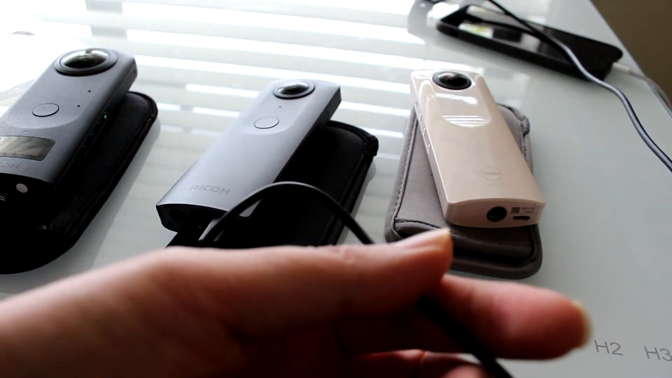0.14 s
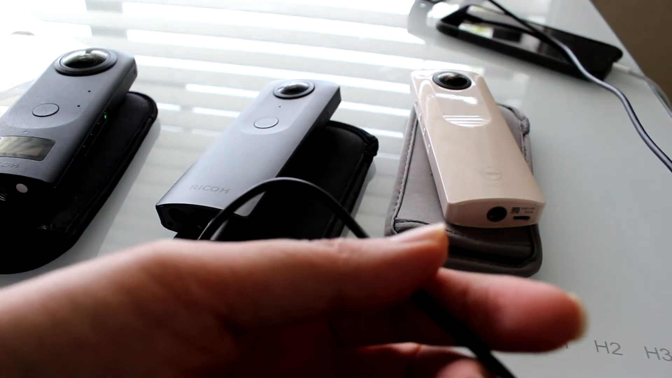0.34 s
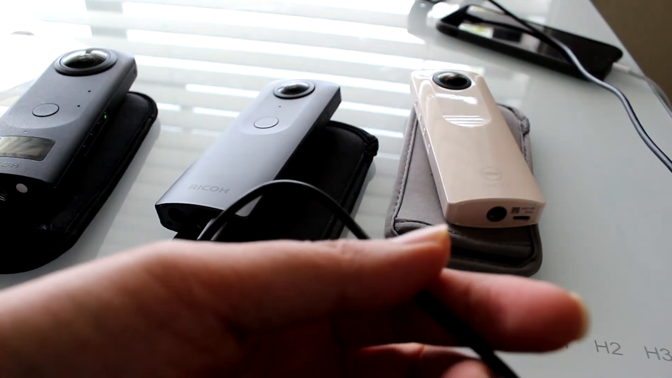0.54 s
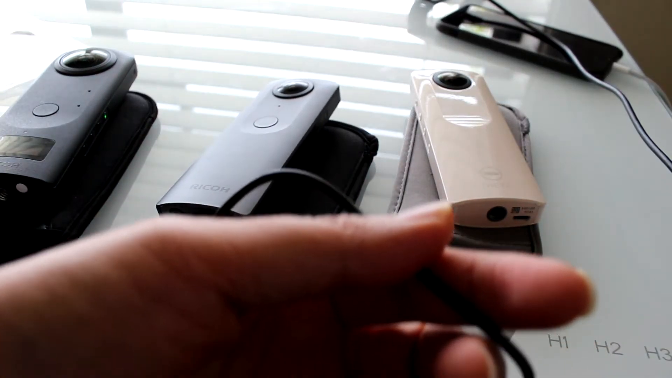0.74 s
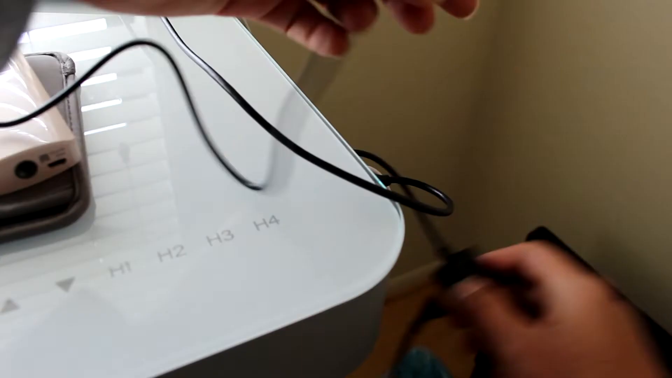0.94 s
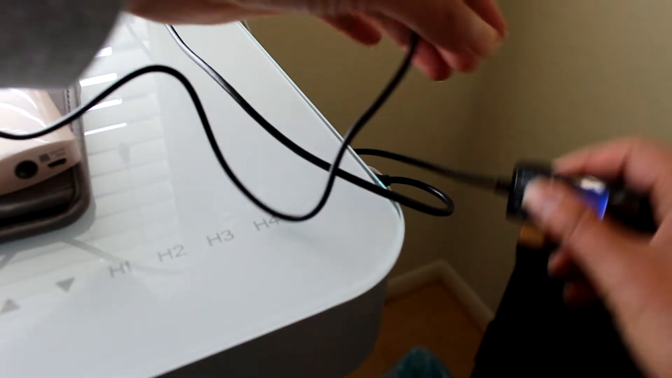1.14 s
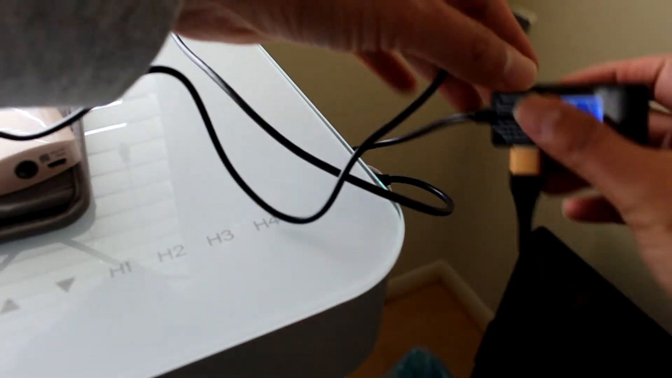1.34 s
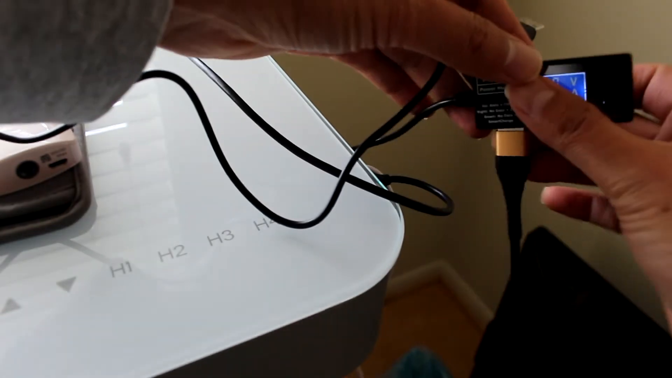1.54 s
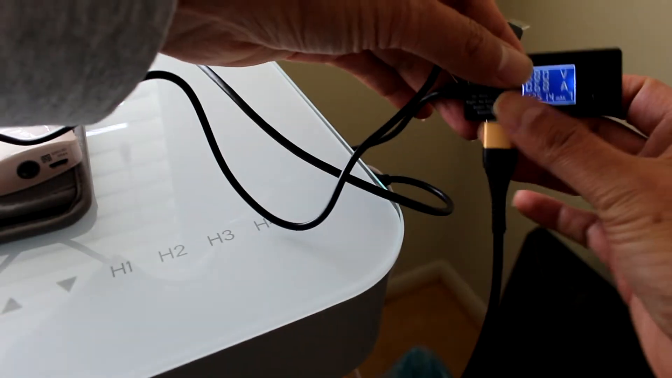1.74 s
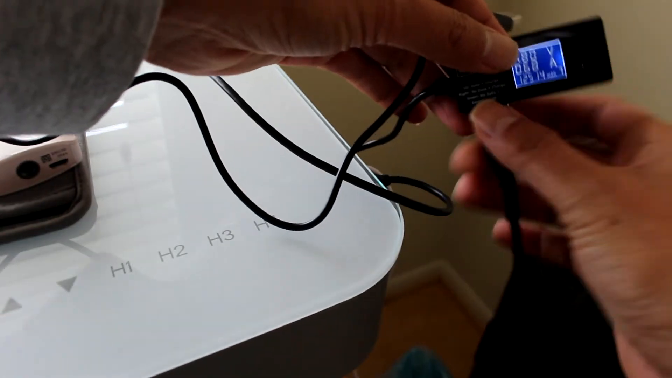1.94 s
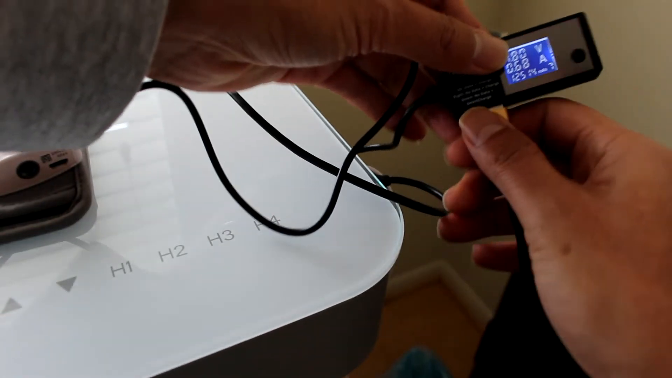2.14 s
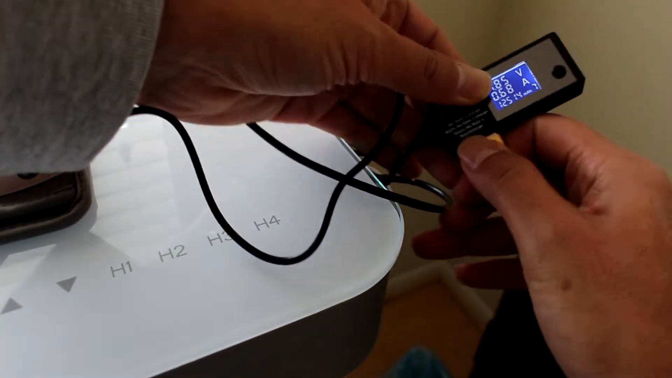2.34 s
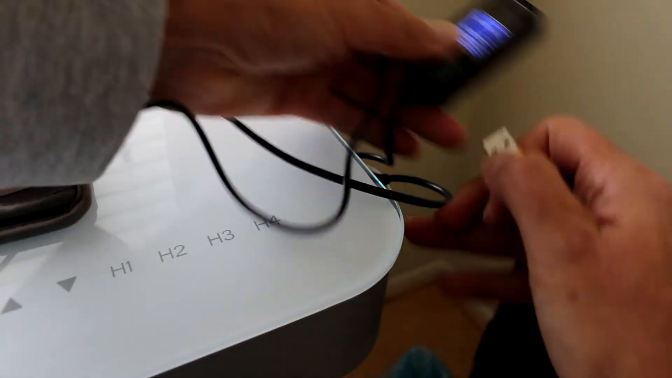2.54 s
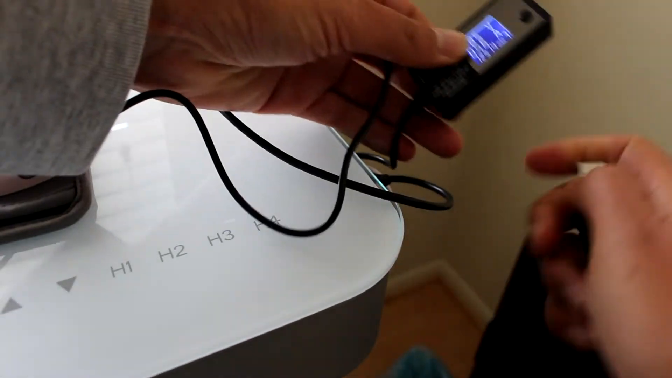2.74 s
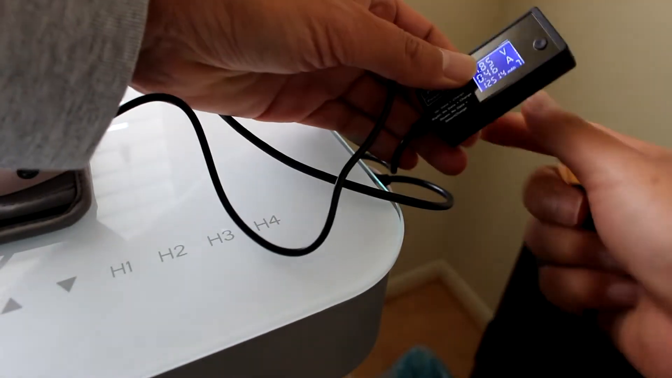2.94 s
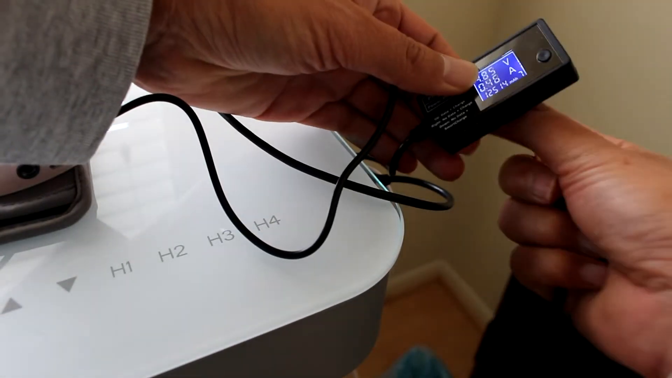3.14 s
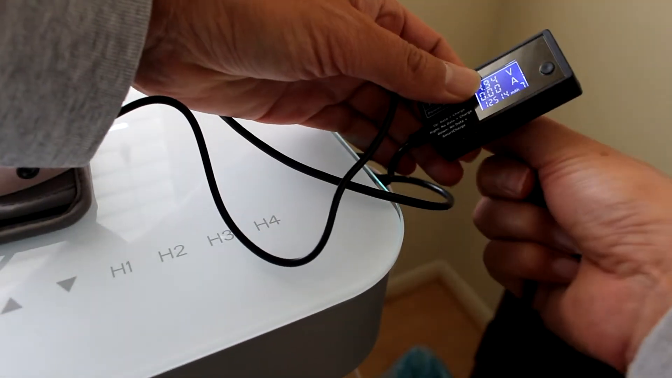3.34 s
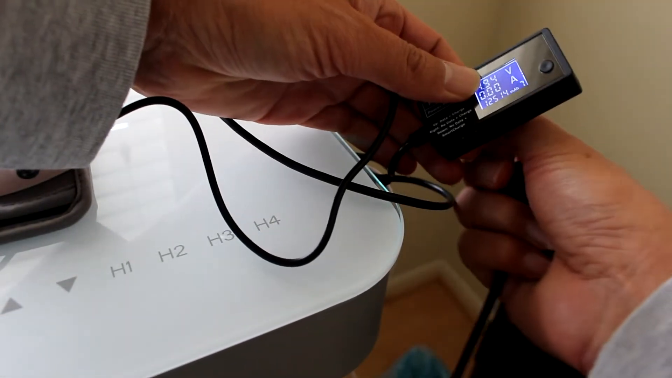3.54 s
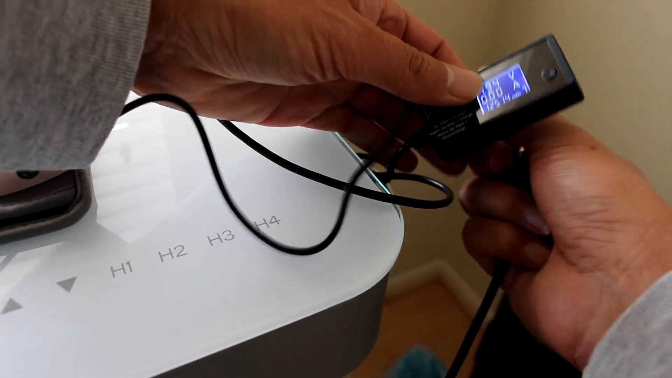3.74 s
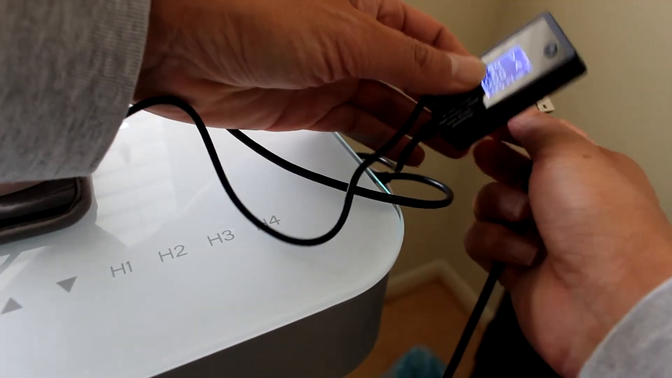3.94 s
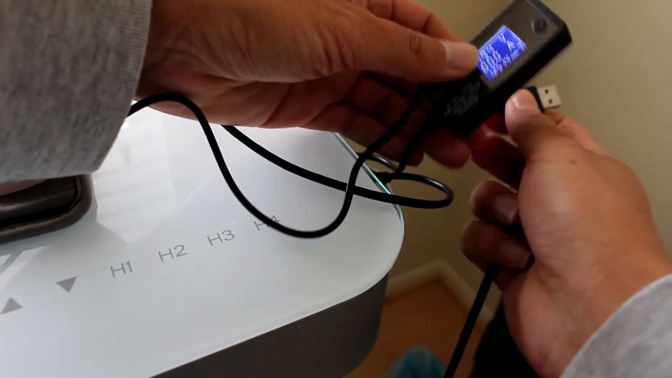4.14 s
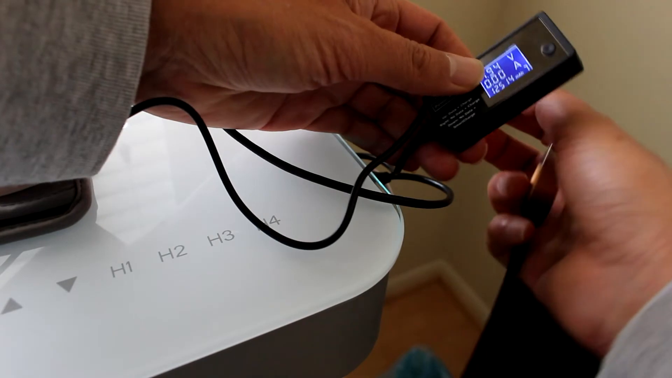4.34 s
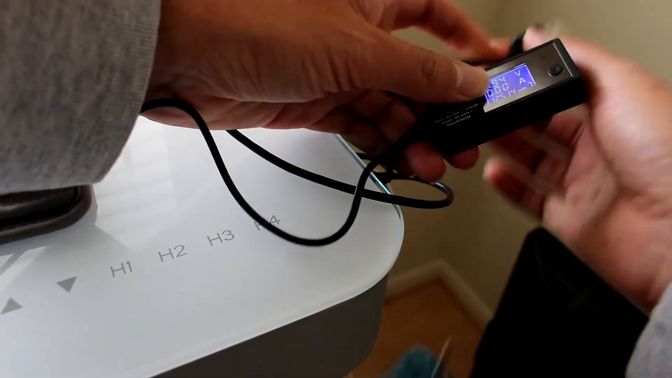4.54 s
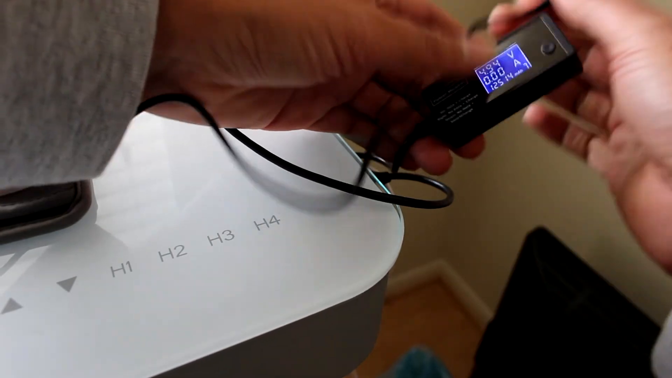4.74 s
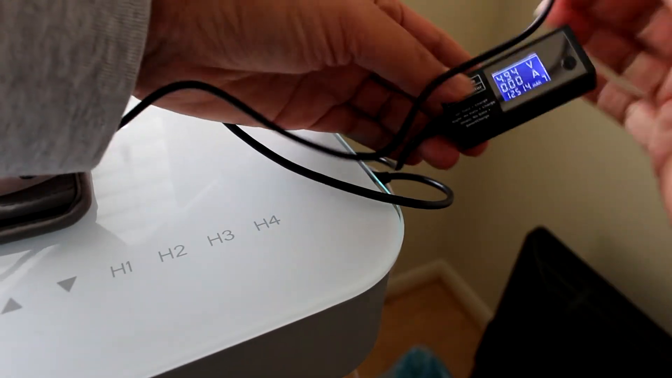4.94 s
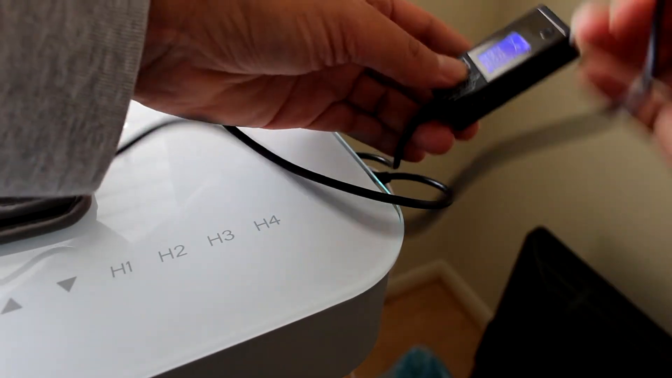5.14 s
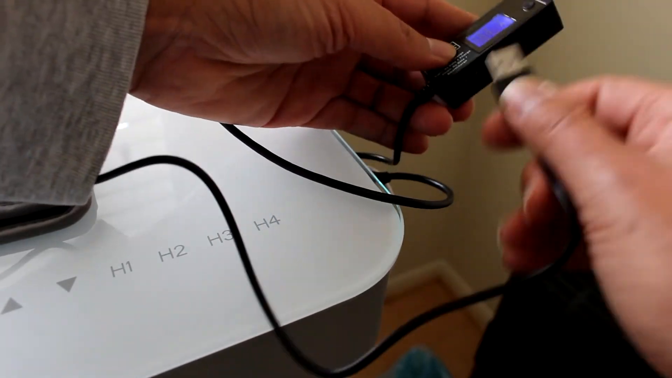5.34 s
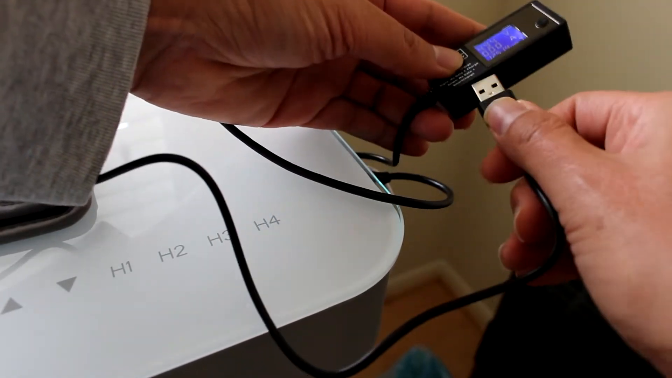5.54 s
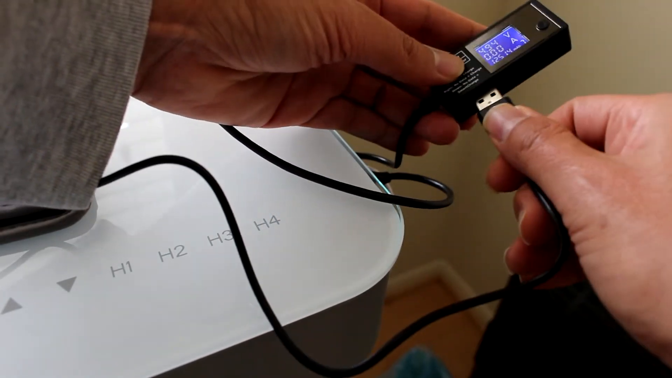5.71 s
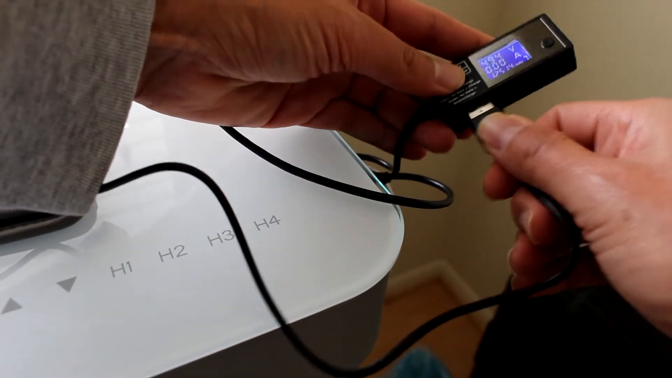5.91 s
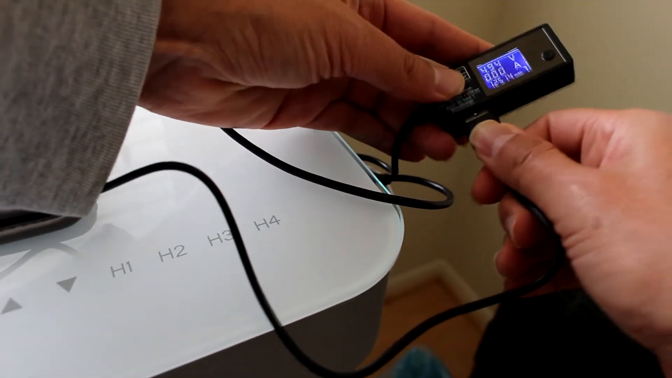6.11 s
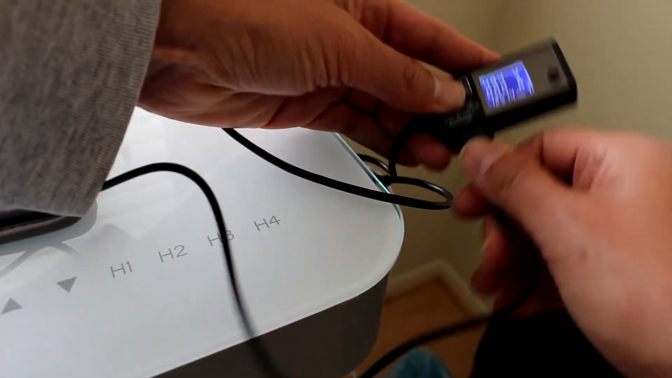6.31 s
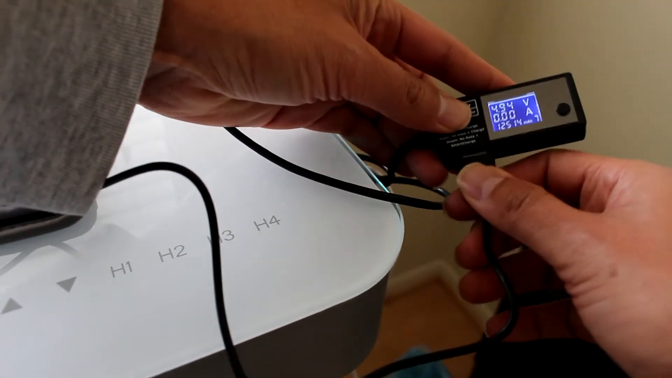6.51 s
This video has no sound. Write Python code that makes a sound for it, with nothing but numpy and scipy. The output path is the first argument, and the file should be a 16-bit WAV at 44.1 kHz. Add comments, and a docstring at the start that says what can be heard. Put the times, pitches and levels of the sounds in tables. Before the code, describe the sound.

Small plastic plugs click and snap in a hollow little case while a cable slaps and drags over a glass table in a quiet, humming room.

```python
"""Plugs click in the hollow case of a small plastic meter as hands pull one out and fit another, on a glass table.
Each click is a short push through the case's resonances, with a snap and a metal tick; slips are swells of noise.
The cable slaps and drags as grainy noise through the table's resonances; low booms and faint scrapes join in.
A small hard room answers with first echoes and a noise tail, over steady air noise and wavering mains hum."""
import sys
import numpy as np
from scipy import signal
from scipy.fft import rfft, irfft, next_fast_len
from scipy.io import wavfile
from scipy.ndimage import uniform_filter1d, map_coordinates

SR = 44100
rng = np.random.default_rng(int(sys.argv[2]) if len(sys.argv) > 2 else 0)


def to_linear_factor(level_db):
    """Convert decibel levels (scalar or array-like) to linear amplitude factors."""
    exponent = np.asarray(level_db, float) / 20
    return 10 ** exponent


def int16_out(signal):
    """Quantize to a 16-bit WAV file."""
    q = np.round(np.clip(np.atleast_2d(signal).T, -1, 1) * 32767)
    wavfile.write(sys.argv[1], SR, q.astype(np.int16))


N = 294147  # length [samples]
EVENT = SR // 8  # length of one dry contact [samples]

# resonances of the table top: (frequency [Hz], width [Hz], level [dB])
TABLE_MODES = [(350, 200, 17), (990, 286, 4), (1250, 84, 6), (1700, 810, 2.5), (2300, 1380, 2),
               (2900, 980, 1.5), (3700, 1020, -0.5), (4800, 1820, -1.5)]


def unit(x):
    """Scales x to rms 1."""
    return x / np.sqrt(np.mean(x ** 2) + 1e-20)


def scaled_to_peak(x, db):
    """Scales x to a peak level in dB."""
    return to_linear_factor(db) * x / np.max(np.abs(x))


def along(points, hz):
    """Reads (Hz, value) points on a logarithmic frequency axis."""
    f, v = np.transpose(points)
    return np.interp(np.log(hz + 1), np.log(f + 1), v)


def filtered(x, response):
    """Multiplies the spectrum of x by a complex response of frequency."""
    n = x.shape[-1]
    m = next_fast_len(n + 2048)
    return irfft(rfft(x, m) * response(np.fft.rfftfreq(m, 1 / SR)), m)[..., :n]


def resonance(f, hz, width):
    """One causal resonance: a damped mass on a spring, with gain 1 at its centre."""
    return 1j * f * width / (hz * hz - f * f + 1j * f * width)


def body(modes, f, hz, spread):
    """The modes of an object; those near the contact's own pitch are driven hardest."""
    total = 0
    for k, (centre, width, db) in enumerate(modes):
        drive_db = db - spread * np.log2(centre / hz) ** 2
        total = total + (-1) ** k * to_linear_factor(drive_db) * resonance(f, centre, width)
    return total


def wobble(rate):
    """A smooth random curve with this many knots a second."""
    knots = rng.standard_normal(int(N * rate / SR) + 4)
    return map_coordinates(knots, [np.arange(N) * rate / SR])


def burst(ms, rise):
    """A contact: noise that dies within its contact time; rise is a fraction of that time."""
    u = np.arange(EVENT) / SR * 1000 / max(ms, .2)
    return rng.standard_normal(len(u)) * np.exp(-u) * (1 - np.exp(-u / rise))


def mix_in(out, x, s):
    """Mixes x into out from second s, cut off at the end of out."""
    part = out[..., round(s * SR):][..., :x.shape[-1]]
    part += x[..., :part.shape[-1]]


def first_echoes(wall_db):
    """Single reflections off the nearest surfaces, dulled above 5 kHz."""
    # (delay [ms], level [dB])
    walls = [(3.5, -9.5), (7.5, -7.5), (14, -14), (22, -17), (41, -28), (45, -22)]
    echoes = np.zeros((2, SR // 16))
    skews = rng.integers(0, 8, (len(walls), 2))  # extra delay in each channel [samples]
    for (ms, db), skew in zip(walls, skews):
        echoes[[0, 1], round(ms * SR / 1000) + skew] = to_linear_factor(db + wall_db)
    return filtered(echoes, lambda f: 1 / (1 + 1j * f / 5000))


def noise_tail(wet_db, alike):
    """A quick near scatter, a slower one, and the far walls, whose bands die at their own speeds."""
    # far walls: (frequency [Hz], time to fall 60 dB [s])
    decay = [(200, 1), (1000, 0.63), (3000, 0.7), (8000, 0.51), (15000, 0.026)]
    hz, t, z = signal.stft(rng.standard_normal((2, SR * 3 // 4)), SR, nperseg=128)
    near = 1.76 * np.exp(-t / 0.029)
    middle = 0.32 * np.exp(-t / 0.096)
    far_onset = .5 + .5 * np.tanh((t - .036) / 0.0041)
    far = to_linear_factor(-60 * t / along(decay, hz)[:, None]) * far_onset
    a, b = signal.istft(z * (near + middle + far), SR, nperseg=128)[1]
    turn = np.arccos(np.clip(alike, 0, 1)) / 2  # sets the likeness of left and right
    mid, side = np.cos(turn) * a, np.sin(turn) * b
    tail = np.array([mid + side, mid - side])
    return tail * to_linear_factor(wet_db) / np.linalg.norm(tail[0])


def room(x, wet_db, wall_db, alike, lag):
    """Direct sound, first echoes and tail; a positive lag [samples] reaches the right channel first."""
    answer = noise_tail(wet_db, alike)
    diffuse = np.zeros_like(answer)
    if len(x) < SR:
        # a single blow radiates unlike in every direction, so its tail keeps only its broad colour
        colour = np.sqrt(np.abs(uniform_filter1d(np.abs(rfft(x)) ** 2, size=50)))
        colour_hz = np.fft.rfftfreq(len(x), 1 / SR)
        diffuse = filtered(answer, lambda f: np.interp(f, colour_hz, colour))
        answer = np.zeros((2, SR // 16))
    mix_in(answer, first_echoes(wall_db), 0)
    answer[0, max(lag, 0)] += 1
    answer[1, max(-lag, 0)] += 1
    heard = signal.fftconvolve(x[None], answer, axes=1)
    heard = np.pad(heard, ((0, 0), (0, diffuse.shape[1])))
    mix_in(heard, diffuse, 0)
    return heard


def clicks():
    """Each contact pushes the hollow case at its own pitch, snaps its upper modes and ticks the metal shell."""
    # plug and fingers on the case, dry: (time [s], push peak [dB], pitch [Hz],
    # snap peak over the push [dB], tick peak over the push [dB])
    contacts = [(1.936, -22.5, 1980, -23, -19), (1.9454, -43, 1520, -10, -15.5),
                (2.5381, -20.5, 2200, -3.5, -2), (2.55, -29, 2270, 4, 16.5), (2.5539, -28, 2430, 12, 2),
                (3.0491, -34.5, 1740, -18, -25.5), (3.7577, -24, 2300, -6.5, -34), (3.845, -31, 1700, 5, 1),
                (4.5205, -43, 1440, 10, -14), (4.9353, -10, 2750, -17, 0), (4.9448, -9.5, 1250, -4, 4),
                (5.061, -19.5, 1520, 3, -24), (5.207, -24.5, 1770, -8, -16),
                (5.6084, -17.5, 1730, -24, -28), (5.6292, -39, 1490, 2.5, 0), (5.6558, -35, 2650, -17, -21),
                (5.6587, -19, 1920, -24, -33), (5.8051, -24.5, 2074, 6, -27), (5.8674, -6, 1930, -21, -16),
                (6.0124, -27, 1880, -11, 0), (6.0188, -24, 2620, -2.5, -7), (6.0264, -30.5, 2150, -1, -18),
                (6.188, -6, 2000, -2.5, -15.5)]
    # resonances of the case: (frequency [Hz], width [Hz], level [dB])
    case_modes = [(1400, 330, 0), (1954, 420, 0.3), (2300, 460, -0.5), (2750, 280, 0.5), (3300, 300, 3.5),
                  (4030, 280, 3.5), (5400, 610, -6.5)]
    out, t = np.zeros((2, N)), np.arange(EVENT) / SR
    impulse = t == 0
    for s, db, hz, snap_db, tick_db in contacts:
        ms = 0.4 * (hz / 2047) ** 0.86  # higher clicks ring a little longer
        u = t * 1000 / ms
        push = u * np.exp(-u) * (np.cos(2 * np.pi * hz * t) + 0.31 * rng.standard_normal(len(t)))
        ring = filtered(push, lambda f: 0.057 + body(case_modes, f, hz, 0.69))
        blow = impulse + 0.45 * burst(0.92, 0.029)
        snap = filtered(blow, lambda f: (0.39 + body(case_modes, f, 5000, 6.6)) * resonance(f, 2330, 2100))
        tap = impulse + 0.32 * burst(ms * 3, 0.028)
        tick = filtered(tap, lambda f: resonance(f, 7800, 5500) ** 2)
        click = scaled_to_peak(ring, db)
        click += scaled_to_peak(snap, db + snap_db)
        click += scaled_to_peak(tick, db + tick_db)
        mix_in(out, room(click, -8, 0, 0.7, lag=rng.integers(0, 2)), s - ms / 1000)
    return out * to_linear_factor([[-.8], [.8]])  # right a little louder [dB]


def slips():
    """The plug slips on the socket: noise swells and fades around a broad resonance."""
    # dry: (time of fullest swell [s], peak [dB], pitch [Hz], swell time scale [ms])
    rubs = [(1.797, -41, 1400, 5.4), (1.799, -39.5, 3940, 5), (1.867, -40, 2000, 4.6),
            (2.01, -38, 2120, 3.3), (2.03, -20.5, 2010, 2.9), (6.183, -28.5, 4440, 2)]
    out, t = np.zeros((2, N)), np.arange(EVENT) / SR
    for s, db, hz, ms in rubs:
        swell = np.exp(-np.abs(t * 1000 / ms - 3) * 0.83) * rng.standard_normal(len(t))
        slip = filtered(swell, lambda f: resonance(f, hz, 0.37 * hz) * (0.11 + resonance(f, hz, 0.47 * hz)))
        mix_in(out, room(scaled_to_peak(slip, db), -10.5, -2.7, 0.71, lag=1), s - 3 * ms / 1000)
    return out * to_linear_factor([[-.8], [.8]])


def slaps():
    """The cable lands along its length: a grainy spread contact rings low and high table modes, and hisses."""
    # cable striking the table, dry: (time [s], peak of the low part [dB], low pitch [Hz],
    # high pitch [Hz], hiss peak over the low part [dB])
    landings = [(0.62, -47, 1970, 3500, -24), (1.067, -43, 2100, 3060, 3.3), (1.294, -24, 2360, 3770, 2),
                (2.438, -37.5, 1060, 3100, -11), (2.594, -46, 2030, 3550, -14.5),
                (3.765, -32, 1400, 2300, -17), (4.487, -51, 1460, 3370, -5.5),
                (4.566, -33.5, 1220, 2670, -7), (4.57, -36, 2620, 4100, 0), (4.617, -31, 950, 2500, -13),
                (4.654, -33.5, 1010, 3160, -12), (4.686, -32.5, 1130, 3700, -16),
                (4.693, -24, 1100, 4400, -16), (4.735, -27.5, 870, 3300, -1), (4.744, -43, 850, 2670, 2),
                (4.774, -39, 1950, 3300, -16), (4.829, -29, 1090, 3300, -39), (4.859, -21, 2170, 2900, -21),
                (4.864, -33.5, 1340, 4800, 5), (4.909, -28, 800, 3080, -1), (4.937, -14, 1264, 2750, -12.5),
                (4.975, -23, 1260, 3040, -6), (5.01, -26, 1250, 2960, -27), (5.042, -17.5, 1450, 2820, -28),
                (5.09, -28.5, 1450, 3000, -40), (5.125, -32, 1350, 3130, -31),
                (5.308, -27.5, 1890, 2900, -18.5)]
    contact_ms = 12
    out = np.zeros((2, N))

    def low_response(f, hz):
        focus = 0.35 + 0.43 * resonance(f, hz, 260) + 0.85 * resonance(f, hz, 62)
        return body(TABLE_MODES, f, hz, 5.5) * focus

    def high_response(f, hz):
        focus = 0.66 + 0.6 * resonance(f, hz, 600) + 1.0 * resonance(f, hz, 110)
        return body(TABLE_MODES, f, hz, 6.7) * focus * resonance(f, 2240, 3300)

    for s, db, low_hz, high_hz, hiss_db in landings:
        high_db = 4 + 0.33 * hiss_db  # a sharper landing hisses more and drives the high modes harder
        grains = to_linear_factor(4 * rng.standard_normal(EVENT // 40 + 1).repeat(40)[:EVENT])  # 40 samples each
        low = filtered(grains * burst(contact_ms * 0.37, 0.22), lambda f: low_response(f, low_hz))
        high = filtered(grains * burst(contact_ms * 0.85, 0.11), lambda f: high_response(f, high_hz))
        hiss = filtered(burst(contact_ms * .5, 0.19),
                        lambda f: resonance(f, 8100, 5900) ** 2 / (1 + (f / 13000) ** 4))
        slap = scaled_to_peak(low, db)
        slap += scaled_to_peak(high, db + high_db)
        slap += scaled_to_peak(hiss, db + hiss_db)
        mix_in(out, room(slap, 1.66, 0, 0.59, lag=0), s - 0.001)
    return out * to_linear_factor([[-.4], [.4]])


def drag():
    """The cable slides over skin and glass: grainy friction in the table's modes and a dry treble rustle."""
    # strokes, dry: (start of the hold [s], hold [s], body level [dB], fall time constant [s],
    # treble over the body [dB])
    strokes = [(0.0, .02, -60, .05, -4.5), (0.192, 0.061, -62.5, 0.028, -3), (0.995, .2, -52.5, 0.052, -5),
               (2.557, 0.051, -47.5, 0.056, -22), (4.573, 0.05, -60, 0.066, 3.5),
               (4.703, .04, -41, 0.082, -22), (4.911, 0.018, -36, .11, -6)]
    rise_s = 0.021
    t, out = np.arange(N) / SR, np.zeros(N)
    grit = to_linear_factor(4.1 * wobble(90)) * rng.standard_normal((2, N))
    low = unit(filtered(grit[0], lambda f: body(TABLE_MODES, f, 2940, 2.35)))
    treble = unit(filtered(grit[1], lambda f: resonance(f, 5700, 7000) ** 2))
    for s, hold_s, db, fall_s, treble_db in strokes:
        before = np.maximum(s - t, 0)
        after = np.maximum(t - s - hold_s, 0)
        press = np.exp(-before / rise_s - after / fall_s)
        out += to_linear_factor(db) * press * (low + to_linear_factor(treble_db) * treble)
    return room(out, -3.2, -2.1, 0.18, lag=1)[:, :N]


def thuds():
    """The table top booms under hands and cable: a fading swing and rough noise at the same pitch."""
    # before the bass cut: (time [s], peak [dB], pitch [Hz])
    booms = [(0.959, -35, 317), (0.962, -38, 600), (1.292, -30.5, 336), (1.41, -43, 570), (1.415, -34, 350),
             (2.542, -39, 167), (2.545, -34, 694), (3.76, -35.5, 680), (3.765, -35.5, 416),
             (4.567, -34, 322), (4.655, -28, 149), (4.695, -24.5, 138), (4.743, -30, 231), (4.80, -34, 417),
             (4.83, -33.5, 350), (4.856, -19.5, 387), (4.89, -27, 436), (4.91, -26.5, 194),
             (4.94, -24, 505), (4.948, -20, 214.6), (4.979, -32, 350), (5.0, -30, 202), (5.04, -30, 233),
             (5.307, -32.5, 292), (6.186, -34.5, 229)]
    out, t = np.zeros(N), np.arange(EVENT) / SR
    for s, db, hz in booms:
        ms = 15.1 * (300 / hz) ** 0.5  # deeper booms last longer
        u = t * 1000 / ms
        swing = np.sin(2 * np.pi * hz * t) * np.exp(-u) * (1 - np.exp(-u / 0.029))
        rough = filtered(burst(ms, 0.16), lambda f: resonance(f, hz, 1.33 * hz) ** 2)
        thud = scaled_to_peak(swing, 0) + scaled_to_peak(rough, 7.5)
        mix_in(out, scaled_to_peak(thud, db), s)
    return out


def scrapes():
    """Faint narrow scrapes: fading noise through a sharp resonance."""
    # before the bass cut: (time [s], peak [dB], pitch [Hz], fade time constant [ms])
    squeaks = [(0.324, -48, 3420, 65), (0.326, -48.5, 2030, 38), (2.7, -51.5, 10300, 39),
               (2.81, -54, 9300, 16), (2.885, -53, 9100, 13), (3.96, -59, 4200, 93), (4.081, -56, 4500, 40),
               (4.175, -53.5, 5200, 60)]
    out = np.zeros(N)
    for s, db, hz, ms in squeaks:
        scrape = filtered(burst(ms, 0.054), lambda f: resonance(f, hz, 0.14 * hz) ** 2)
        mix_in(out, scaled_to_peak(scrape, db), s)
    return out


def thuds_and_scrapes():
    """Booms and scrapes share one answer of the room; the table radiates no deep bass."""
    dry_sound = thuds() + scrapes()
    dry_sound = filtered(dry_sound, lambda f: (1j * f / (110 + 1j * f)) ** 3)
    return room(dry_sound, -5, -31.5, 0.97, lag=0)[:, :N]


def hum():
    """Tones of a distant mains machine, each slightly unsteady in level and phase."""
    # before wobble and channel gain: (frequency [Hz], rms level [dB])
    tones = [(60, -69.5), (240, -58), (300, -62), (360, -70), (420, -69), (436, -65), (540, -67),
             (660, -77.5), (900, -72), (960, -90), (1020, -67), (1320, -70)]
    t, out = np.arange(N) / SR, np.zeros(N)
    for hz, db in tones:
        level = np.sqrt(2) * to_linear_factor(db + 1.48 * wobble(6.2))
        out += level * np.sin(2 * np.pi * hz * t + 0.26 * wobble(4.93))
    return out * to_linear_factor([[.4], [-.4]])


def air_noise():
    """Broadband noise with a slowly wavering level, more alike left and right in the bass than the treble."""
    # (frequency [Hz], relative spectral level [dB])
    colour = [(14, -46), (25, -19), (40, -12.5), (100, -11), (200, -8.5), (300, -5), (450, -7.5),
              (520, -13), (1000, -11), (1500, -14.5), (2670, -21), (5000, -24.5), (11500, -32),
              (16000, -41.5)]
    # (frequency [Hz], left-right likeness [0 to 1])
    likeness = [(30, 0.49), (180, 0.52), (550, 0.5), (1650, 0.18), (4970, 0), (15000, 0)]

    def mid_side(hz):
        turn = np.arccos(np.clip(along(likeness, hz), -1, 1)) / 2
        return to_linear_factor(along(colour, hz)) * [np.cos(turn), np.sin(turn)]

    mid, side = filtered(rng.standard_normal((2, N)), mid_side)
    level_db = -51 + 0.71 * wobble(3.4)
    return to_linear_factor(level_db) * unit(np.array([mid + side, mid - side]))


def scene():
    """All sources at the two microphones."""
    plug = clicks() + slips()
    cable_and_table = slaps() + drag() + thuds_and_scrapes()
    return plug + cable_and_table + hum() + air_noise()


def low_pass(x):
    """Removes everything above the highest recorded frequency."""
    return signal.sosfilt(signal.butter(12, 16820, fs=SR, output="sos"), x)


def record(dry):
    """Stores the finished mix of the two microphones."""
    return low_pass(dry)


dry = scene()
out = record(dry)
int16_out(out)
```